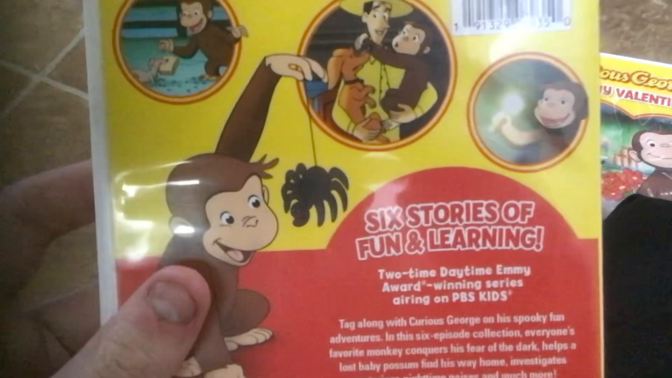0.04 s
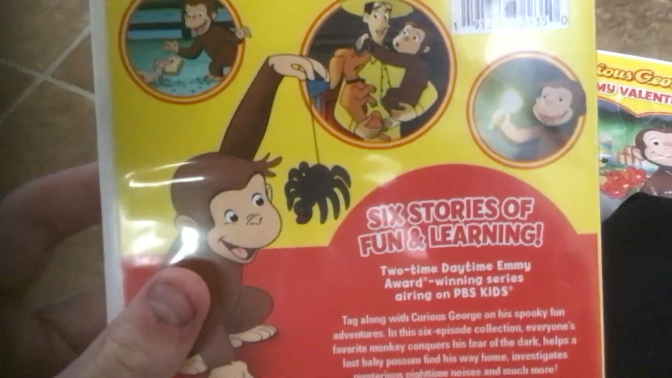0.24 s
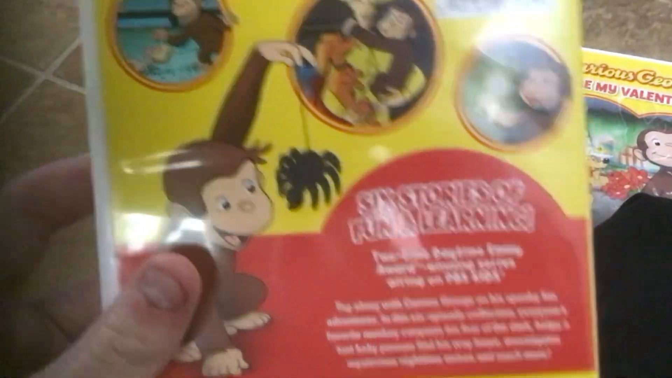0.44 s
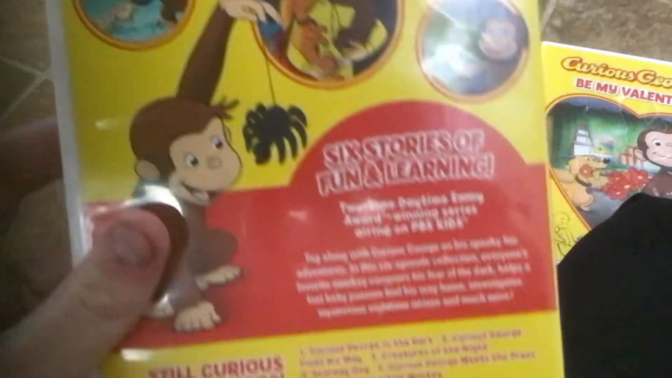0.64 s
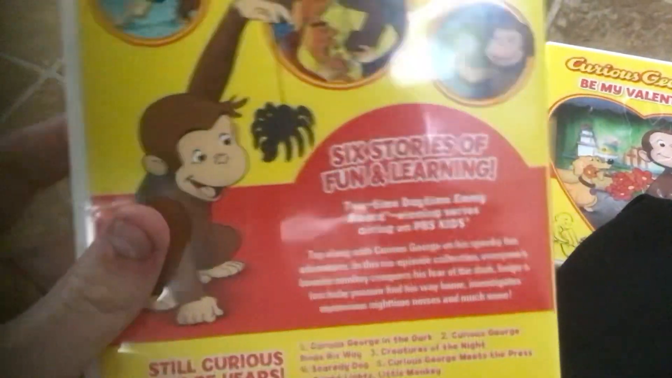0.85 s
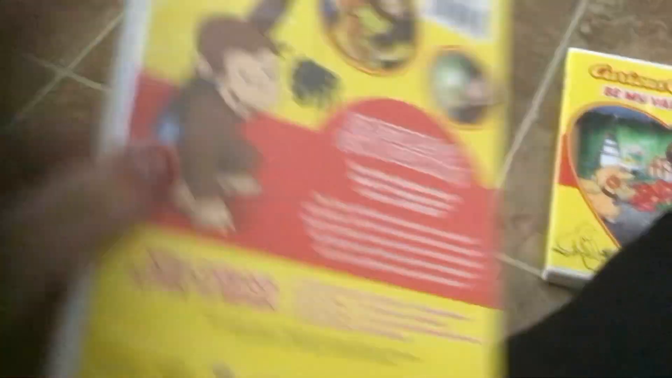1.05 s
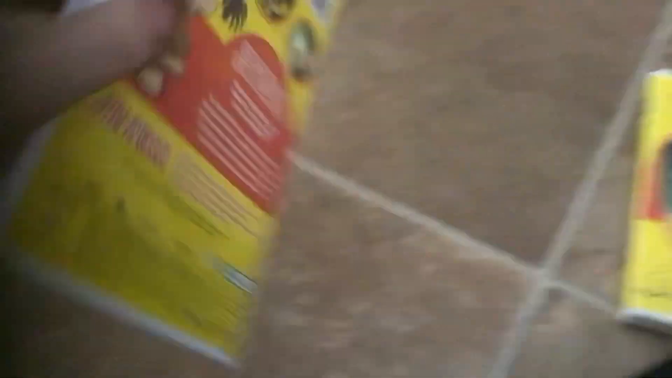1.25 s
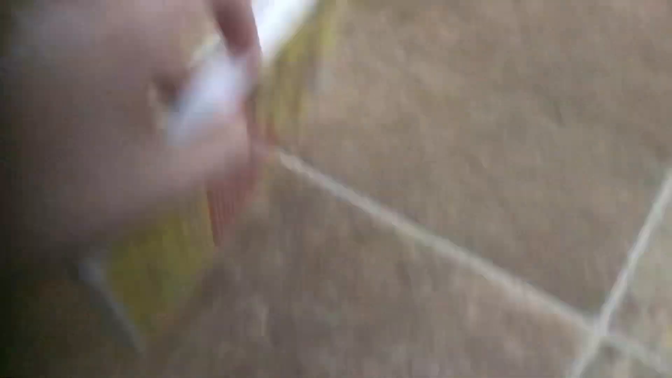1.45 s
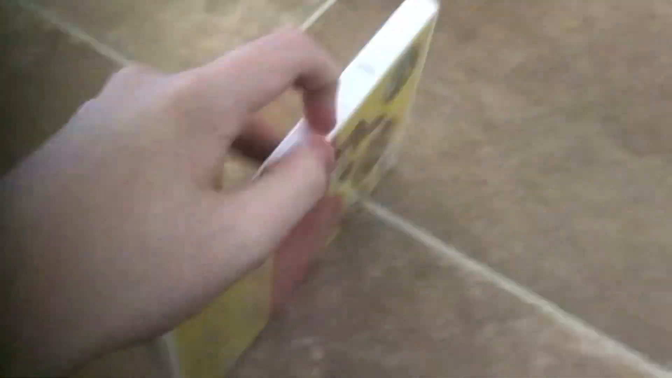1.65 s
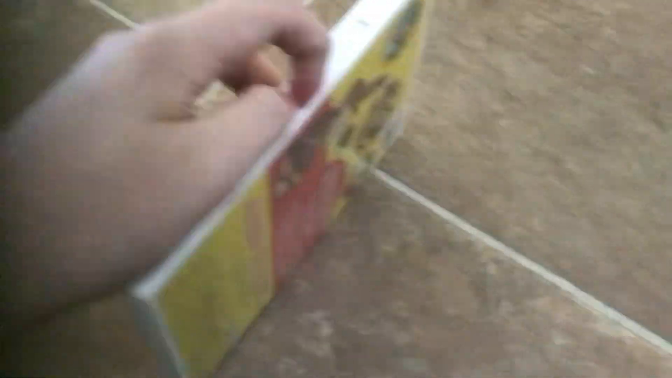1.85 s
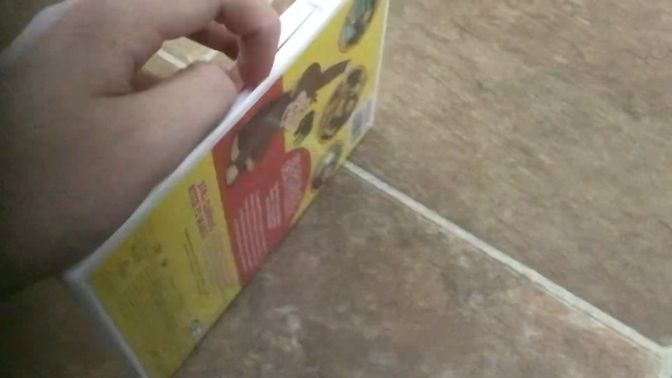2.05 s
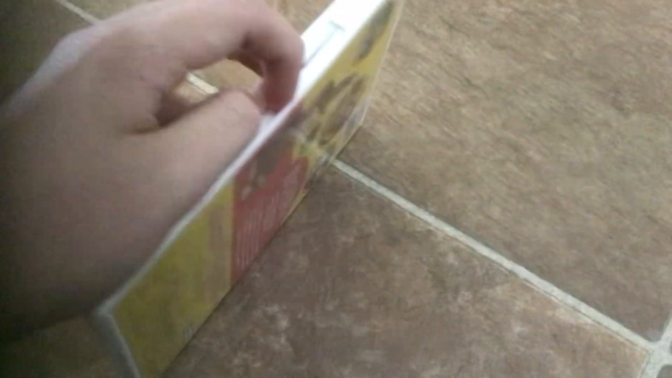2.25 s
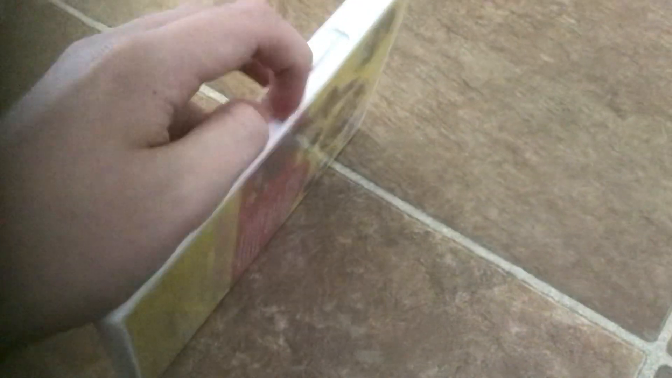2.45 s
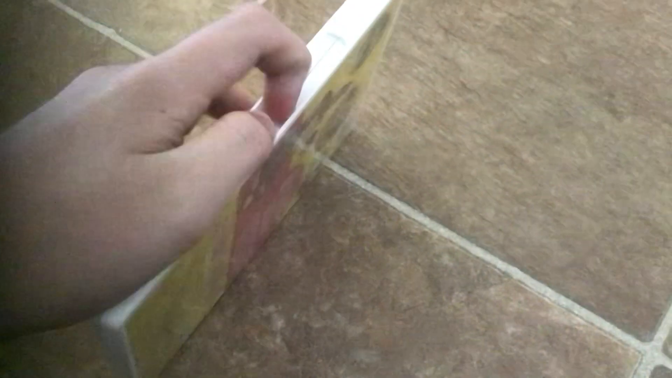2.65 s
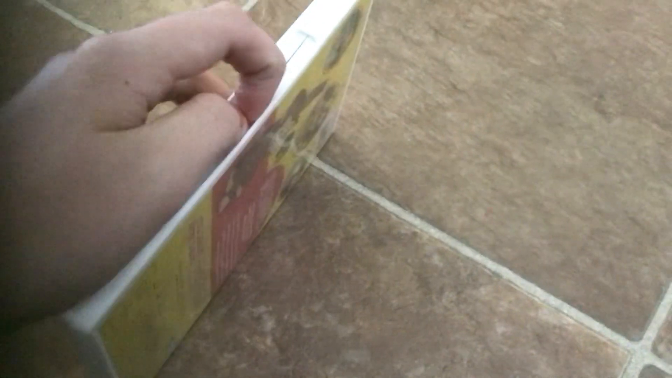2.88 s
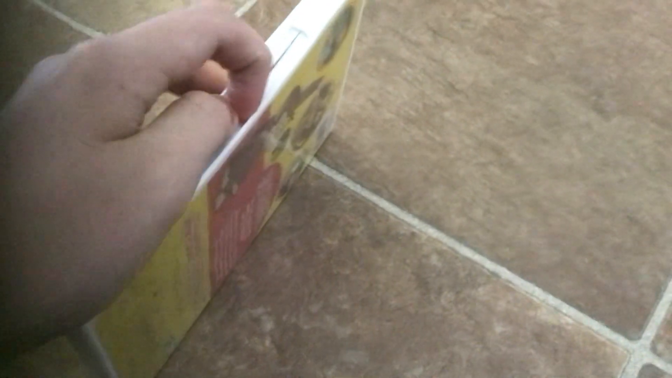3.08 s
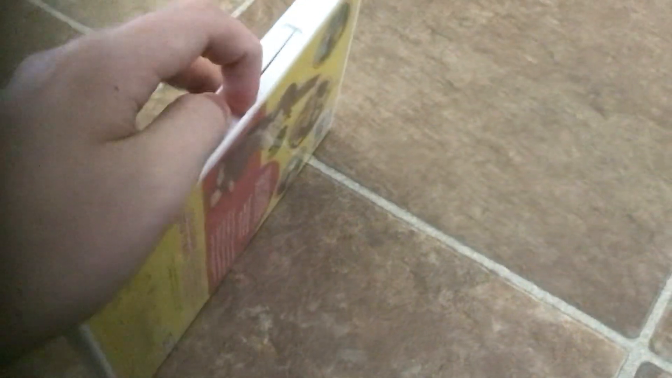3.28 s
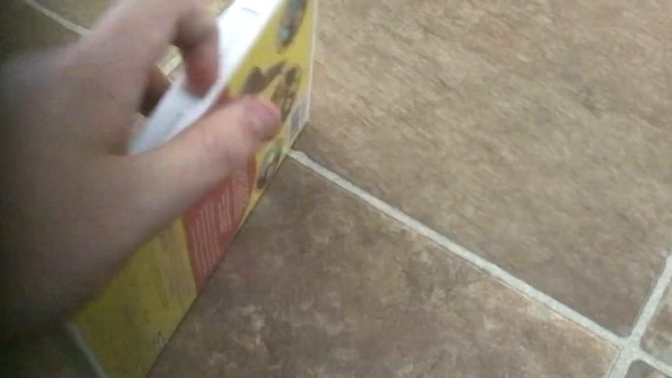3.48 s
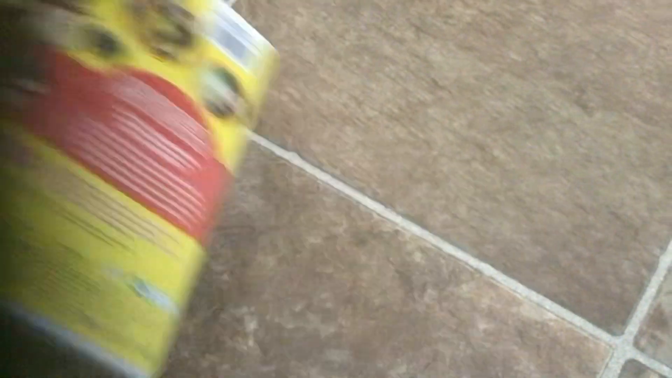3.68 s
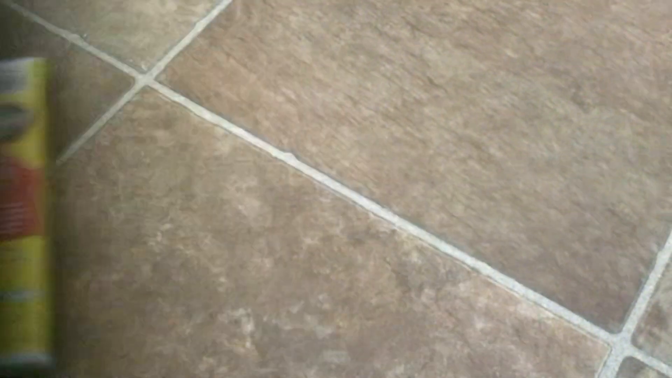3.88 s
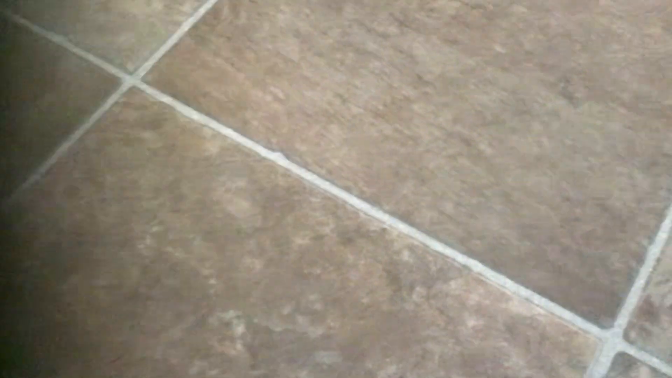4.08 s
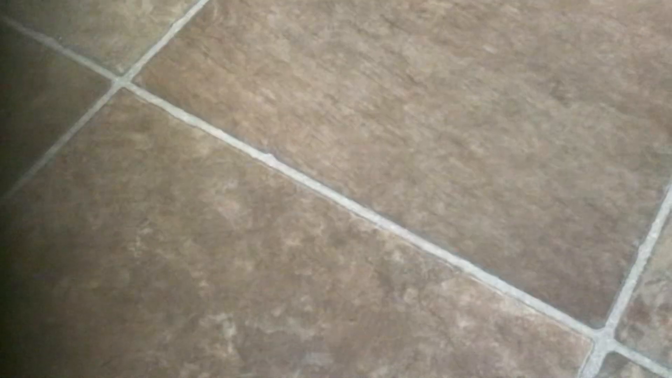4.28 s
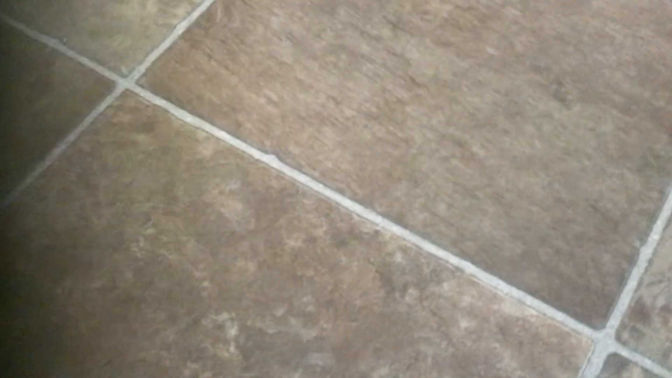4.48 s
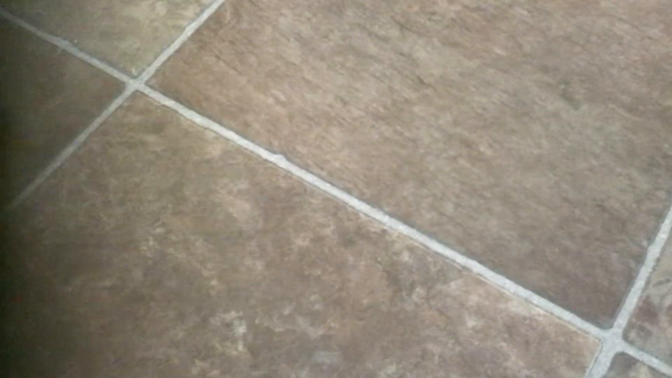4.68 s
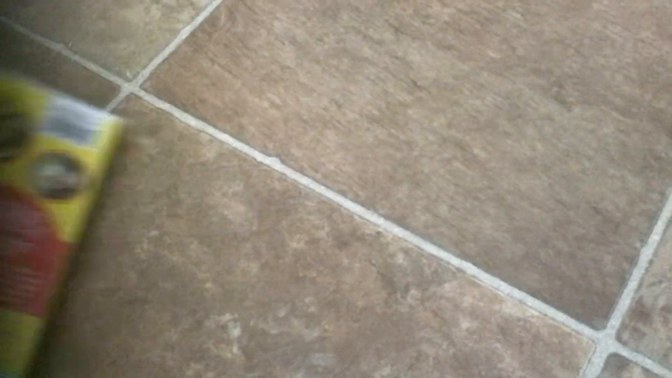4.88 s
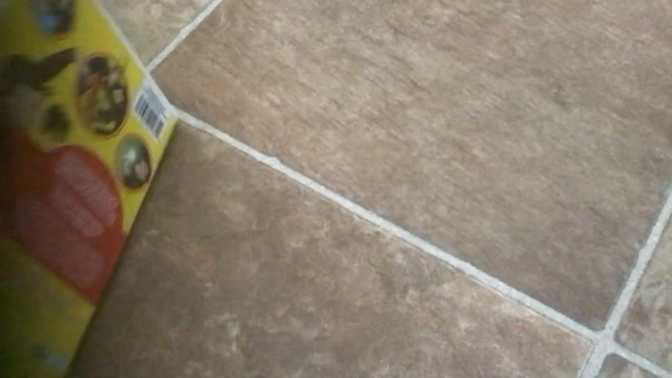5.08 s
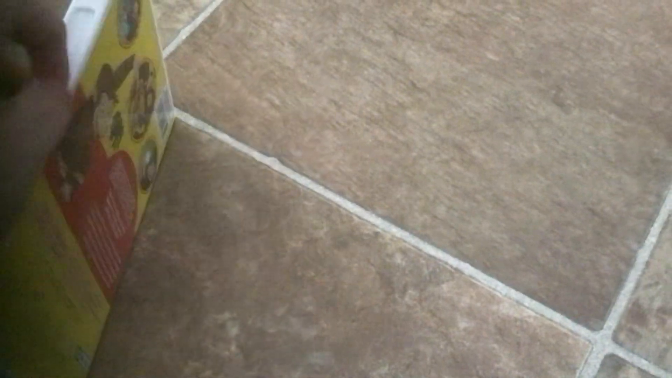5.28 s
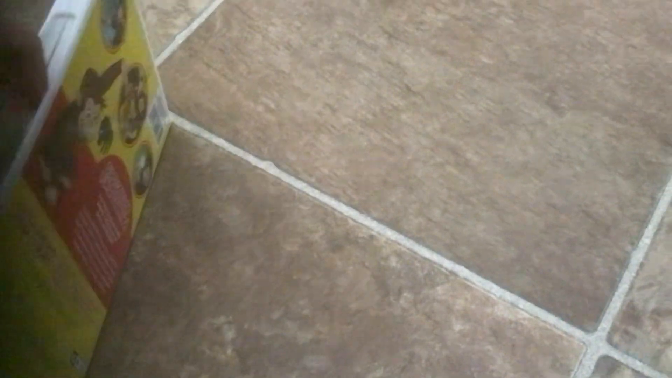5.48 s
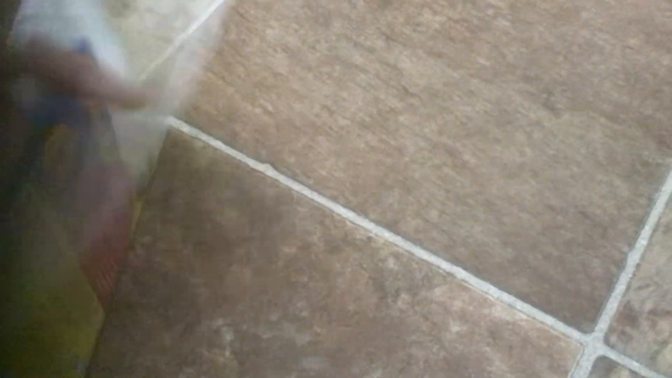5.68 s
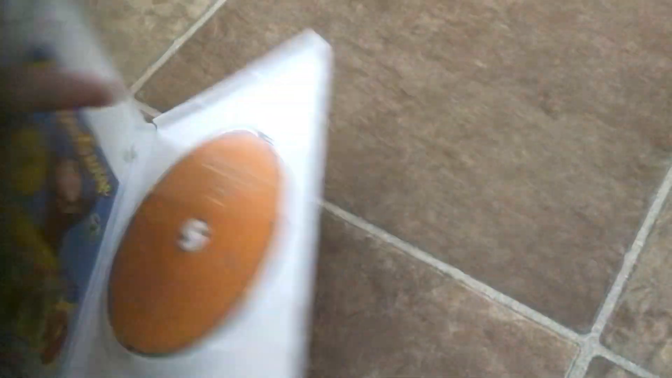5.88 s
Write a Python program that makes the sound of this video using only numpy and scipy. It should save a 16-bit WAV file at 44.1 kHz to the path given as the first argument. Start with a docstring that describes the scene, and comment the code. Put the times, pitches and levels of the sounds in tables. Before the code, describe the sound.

Close, plain indoor capture: a distant engine drone fades away early under soft hiss. A thin plastic case ticks and slides under fingers, knocks hard against the floor, then is gently worked with tiny film crackles. Clicking builds into a longer burst of snaps and knocks, drops back to creaks and soft bumps, and ends with a bright clasp snap ringing briefly in the room.

```python
"""Room tone and a low hum, noise and wavering sines, persist; a distant engine drone sinks and fades early on.
A hand turns a thin plastic disc case close to a microphone: creaks and slides are resonance-filtered noise.
Light ticks, interrupted by three bursts of hard knocks on a tiled floor and snaps of the clasps it pries open,
excite damped modes of shell, lid panels and air pocket; bright flecks of the sleeve film, short noise bursts,
are scattered among the ticks. A bare room answers contacts and handling by convolution with decaying noise."""
import sys
import numpy as np
from scipy import signal
from scipy.fft import rfft, irfft, next_fast_len
from scipy.io import wavfile
from scipy.ndimage import map_coordinates

SR = 44100
rng = np.random.default_rng(int(sys.argv[2]) if len(sys.argv) > 2 else 0)


def to_wav(s):
    """Save 16-bit WAV."""
    ch = np.atleast_2d(s).T  # columns
    pcm = np.round(np.clip(ch, -1, 1) * 32767)  # PCM
    wavfile.write(sys.argv[1], SR, pcm.astype(np.int16))


N = 261513

# bending modes of the shell: [f/Hz, nominal bandwidth/Hz, relative level/dB]
SHELL_MODES = [(1385, 440, -9), (1617, 230, -1), (1795, 160, -1), (1947, 190, 2), (2114, 180, -1.5),
               (2448, 250, -6.5), (2604, 120, -3), (2816, 190, -2.5), (3121, 220, 3), (3365, 130, -5),
               (3690, 190, -7), (4215, 190, -10), (4698, 620, -12), (5270, 650, -17.5), (6200, 2200, -22.5)]
# slow modes of the lid panels: [f/Hz, bandwidth/Hz, relative level/dB]
PANEL_MODES = [(94.5, 32, -3.5), (148.3, 7.4, 0), (185.6, 23.3, -1), (267.3, 45.7, -3), (372.7, 80, -11.5)]
# resonances of the air pocket between the lids: [f/Hz, nominal bandwidth/Hz, relative level/dB]
HOLLOW_MODES = [(586.4, 70, -3.5), (705, 110, -8.5), (980, 330, 2), (1127, 530, 4)]
RIM_HZ = 2500  # shell modes above this belong to the stiff rim


def amp(db):
    """Logarithmic level: decibels become an amplitude ratio."""
    return 10 ** (np.asarray(db) / 20)


def unit(x):
    """Normalisation of a signal to rms 1."""
    return x / np.sqrt(np.mean(x ** 2) + 1e-20)


def peak_one(x):
    """Normalisation of a signal to peak 1."""
    return x / np.abs(x).max()


def along(points, hz):
    """Spectral interpolation of (f/Hz, value) points on a logarithmic frequency axis."""
    f, value = np.transpose(points)
    return np.interp(np.log(hz + 1), np.log(f + 1), value)


def curves(rows):
    """Linear interpolation in time: one value per sample for each column after t/s."""
    knot_s, *columns = np.transpose(rows)
    return [np.interp(np.arange(N) / SR, knot_s, column) for column in columns]


def wobble(rate):
    """Slow random modulation: a spline through Gaussian values, rate knots per second."""
    knots = rng.standard_normal(int(N * rate / SR) + 4)
    return map_coordinates(knots, [np.arange(N) * rate / SR])


def filtered(x, response):
    """Linear filtering: the spectrum of x times a response of frequency."""
    m = next_fast_len(len(x) + 4096)
    return irfft(rfft(x, m) * response(np.fft.rfftfreq(m, 1 / SR)), m)[:len(x)]


def modes(table, extra_db=0):
    """Modal superposition: the causal response of a sum of resonances with alternating sign."""
    rows = np.array(table, float)
    centre, width = rows[:, :1], np.abs(rows[:, 1:2])
    db = rows[:, 2:] + np.reshape(extra_db, (-1, 1))
    sign = (-1.) ** np.arange(len(rows))[:, None]

    def response(f):
        """Band-pass resonators, each of unit gain at its centre before its level."""
        resonance = 1j * f * width / (centre * centre - f * f + 1j * f * width)
        return np.sum(sign * amp(db) * resonance, axis=0)
    return response


def grit(rate, depth_db):
    """Amplitude modulation: white noise whose level in dB wanders at random, rate knots per second."""
    return rng.standard_normal(N) * amp(depth_db * wobble(rate))


def tone(hz, db):
    """Phase integration: a sine whose frequency and rms level waver slightly."""
    phase = 2 * np.pi * np.cumsum(hz + 1.2 * wobble(46)) / SR
    level = np.sqrt(2) * amp(db + 1.4 * wobble(2.7))
    return level * np.sin(phase + rng.uniform(0, 2 * np.pi))


def background():
    """Superposition of shaped room noise, steady hum lines and two gliding, fading drone tones."""
    # room tone and hiss: [f/Hz, relative spectral density/dB per Hz]
    air_spectrum = [(42, -24), (72, 0.5), (136, -3.5), (178, -16.5), (336, -32), (579, -25), (760, -30.5),
                    (998, -35.5), (1280, -37.5), (1530, -34), (3100, -42.5), (3550, -39), (10100, -45.5),
                    (16200, -49)]
    # hum lines: [f/Hz, mean level/dB]
    hum_lines = [(59, -63.5), (120, -74)]
    # upper tone of the engine drone: [t/s, f/Hz, mean level/dB]
    upper_drone = [(0, 108, -53), (.3, 106.9, -56.5), (.56, 103.5, -59), (.78, 99.7, -56.5),
                   (.9, 96.3, -68.5), (1.05, 92.4, -68), (1.3, 85.07, -60.5), (1.45, 84.4, -64),
                   (2.05, 85, -63.5), (2.2, 84.2, -88)]
    # lower tone of the engine drone: [t/s, f/Hz, mean level/dB]
    lower_drone = [(0, 62.24, -51.5), (.1, 65.16, -55.5), (.55, 66.16, -57.5), (.77, 63.24, -52),
                   (.85, 62.3, -71), (.95, 62.76, -94)]
    air = amp(-67) * unit(filtered(grit(16, 0.6), lambda f: amp(along(air_spectrum, f))))
    hum = sum(tone(*line) for line in hum_lines)
    drone = tone(*curves(upper_drone)) + tone(*curves(lower_drone))
    return air + hum + drone


def room(x):
    """Reverberation: convolution with noise in which each frequency decays at its own rate."""
    # reverberation time: [f/Hz, T60/s]
    decay_times = [(150, 0.37), (600, 0.49), (2000, 0.44), (5000, 0.43), (12000, 0.27)]
    # colour of the echo: [f/Hz, relative level/dB]
    echo_colour = [(100, -6.5), (300, 1.5), (900, -2.5), (1600, -2.5), (2000, -1.5), (2400, -4),
                   (3300, -5.5), (5500, 5.5), (14000, -1.5)]
    hz, t, z = signal.stft(rng.standard_normal(SR // 2), SR, nperseg=256)
    decay_db = 60 * t / along(decay_times, hz)[:, None]
    z = z * amp(along(echo_colour, hz)[:, None] - decay_db)
    tail = signal.istft(z, SR, nperseg=256)[1]
    tail = tail * np.clip(np.arange(len(tail)) / (0.0047 * SR), 0, 1)  # first walls arrive after a few ms
    return signal.fftconvolve(x, tail / np.linalg.norm(tail))


def hand():
    """Power addition: each movement rises exponentially up to its start, holds and decays exponentially."""
    # movements of the hand: [start t/s, length/s, creak level/dB,
    # then re creak: rim creak/dB, finger slide/dB, hollow scrape/dB, grip rumble/dB]
    moves = [(0.194, .4, -88.5, -7, -5, -5, 19.5), (0.901, 0.13, -72, -5, -8, -11, 3.5),
             (1.049, 0.24, -74, -7, 0.5, 0.5, -1), (1.288, 0.3, -84.5, -7, 6, 2.5, 12),
             (1.8, 0.15, -70, -6, -14.5, -3.5, 6), (2.001, 0.25, -82.5, -10, -9.5, -2, -2),
             (2.5, 0.059, -83.5, -10, -8.5, -7.5, 4), (2.59, .09, -77.5, -7.5, -11.5, -3, 7),
             (2.69, 0.11, -72, -12, -13, -8, 3.5), (2.87, 0.12, -76, -9.5, -12.5, -6, 3),
             (2.934, 0.025, -81, -4.5, 2, -15.5, 4), (3.14, 0.098, -77, -8, -13, -5.5, 4.5),
             (3.44, 0.06, -72, -6.5, -6, -6, -3), (3.532, .17, -64.5, -8.5, -18, -4, 0),
             (3.719, 0.16, -63, -6, -15, -8, 2), (4.083, 0.15, -62, -7.5, -17, -2, -1.5),
             (4.263, 0.039, -73, -4, -1.5, -8, 7.5), (4.34, 0.079, -74.5, -6, -10.5, -5, 8.5),
             (4.44, 0.088, -71.5, -9, -5.5, -4.5, 4), (4.576, 0.03, -70.5, 4, -8, -7.5, 8.5),
             (4.63, 0.049, -79, -7.5, -7, -10, 11), (4.705, 0.079, -70.5, -3, -8.5, 7.5, 3.5),
             (4.816, 0.065, -76, -8.5, -10, -1.5, 5.5), (4.884, 0.1, -64, -7.5, -10.5, 0.5, 6.5),
             (5.09, .09, -73, -8, -6.5, -3, 0.5), (5.19, 0.15, -74.5, -5.5, -15, -5, 3.5),
             (5.429, 0.078, -70, -7, -24, 0, 9.5), (5.561, 0.24, -74.5, -7, -7, -1.5, -1.5)]
    # the still hand, levels/dB: [creak, rim creak, finger slide, hollow scrape, grip rumble]
    rest_db = [-91, -98.5, -89.5, -91.5, -72]
    rise_db_per_s, fade_db_per_s = 505, 251.5
    t = np.arange(N) / SR
    power = amp(np.reshape(rest_db, (-1, 1))) ** 2
    for s, length, db, *others in moves:
        rise_db = -rise_db_per_s * np.maximum(s - t, 0)
        fade_db = -fade_db_per_s * np.maximum(t - s - length, 0)
        layer_gain = amp(db + np.array([0, *others]))[:, None]
        power = power + layer_gain ** 2 * amp(2 * (rise_db + fade_db))
    return np.sqrt(power)


def handling():
    """Friction noise: grains excite shell, air pocket and panels, skin hisses on the sleeve; the room answers."""
    # fingers on the sleeve: [f/Hz, relative spectral density/dB per Hz]
    slide_spectrum = [(2350, -27), (4000, 2), (4170, -1.5), (4900, -6.5), (5380, -11), (6440, -8.5),
                      (10800, -3), (12500, -7.5), (16000, -28.5)]
    strain = grit(180, 3.2)  # shared by the creaks of body and rim
    creak = unit(filtered(strain, modes([m for m in SHELL_MODES if m[0] <= RIM_HZ])))
    rim = unit(filtered(strain, modes([m for m in SHELL_MODES if m[0] > RIM_HZ])))
    slide = unit(filtered(grit(98, 1.87), lambda f: amp(along(slide_spectrum, f))))
    scrape = unit(filtered(grit(88, 1.5), modes(HOLLOW_MODES, [-2.0, 8.5, -1.0, -7.5])))
    grip = unit(filtered(grit(25, 2), modes(PANEL_MODES)))
    near = np.sum(hand() * [creak, rim, slide, scrape, grip], axis=0)
    return near + amp(-6.5) * room(near)[:N]


def contacts():
    """Impact parameters as (t/s, blow/dB, thud, hollow, crack and rim modes/dB, contact time/s)."""
    # light ticks of the shell under the fingers:
    # [t/s, blow level/dB, crack re blow/dB, rim modes re lower modes/dB]
    tick_rows = [(0.914, -46.5, -3, 3), (0.962, -51, -31, -5.5), (1.095, -37.5, -27, -9),
                 (1.104, -29.5, -13, -2), (1.124, -45.5, -4, -9), (1.132, -40, -25, 2.5),
                 (1.157, -52, -12, 5.5), (1.194, -39, -33, -1), (1.211, -48.5, -26, 1.5),
                 (1.238, -57.5, -10.5, -4.5), (1.332, -51, -16, -1.5), (1.418, -60.5, -11, -5),
                 (1.455, -50.5, -9.5, -10), (1.815, -38, -11.5, -9), (1.835, -45, -21, -4),
                 (1.841, -44, -30, -2), (1.861, -47, -26, -4), (1.927, -58.5, -21, 0),
                 (2.141, -49.5, -30, -6), (2.502, -69, -8, -10.5), (2.6, -73, 3, 12), (2.656, -52, -18, -8),
                 (2.675, -46.5, -17, -11), (2.828, -53.5, -13, -5), (3.438, -62.5, -1.5, -1.5),
                 (3.479, -52.5, -4.5, -7.5), (3.511, -43.5, -18, 5), (3.543, -58, -21, -3),
                 (3.569, -28, -20, -0.5), (3.581, -34.5, -15.5, -13.5), (3.626, -41, -14, -7.5),
                 (3.639, -38.5, -19, 7.5), (3.654, -36, -28.5, -1.5), (3.675, -42, -24, -4),
                 (3.739, -43.5, -25.5, -2.5), (3.78, -55.5, -12.5, -9), (4.08, -32.5, -15.5, -9),
                 (4.47, -50.5, -14.5, -16), (4.495, -58, -12, 2), (4.889, -46.5, -9, -6.5),
                 (4.937, -51, -13, -3), (5.009, -55, -17, -1.5), (5.134, -45, -12, -2.5),
                 (5.177, -55, -21, -2), (5.216, -57, -23, -9.5), (5.355, -50.5, -13, -17.5),
                 (5.426, -44, -0.5, -10), (5.448, -40.5, -11, -2.5), (5.475, -40, -18, -1.5),
                 (5.507, -43.5, -33, 4), (5.574, -55.5, -22, 10), (5.589, -50, -20, 2)]
    # hard knocks on the floor and clasp snaps, with their rattles: [t/s, blow level/dB,
    # thud re blow/dB, hollow knock re blow/dB, crack re blow/dB, rim modes re lower modes/dB, contact time/s]
    knocks = [(1.505, -22, -0.5, -3, -4.5, 0, 0.0017), (1.514, -23, -3, -14.5, -21, -1, 0.0021),
              (1.525, -4, -20.5, -6, -18.5, -7, 0.001), (1.538, -17, -4, -13.5, -14.5, -0.5, 0.0026),
              (1.548, -22.5, -8.5, -11, -13, 4, 0.0012), (3.832, -9, -23.5, -17.5, -18.5, -12, 0.0027),
              (3.853, -18, -20, -8.5, -13, 1.5, 0.0034), (3.865, -23.5, -19.5, -9, -18.5, 3.5, 0.0025),
              (3.873, -23, -23, -17.5, -21.5, 4.5, 0.0012), (3.891, -9.5, -22, -9.5, -16, -10, 0.0015),
              (3.908, -13.5, -30, -4.5, 2, -1, 0.00068), (3.911, -8, -16, -10, -7.5, -8, 0.0015),
              (3.9161, -2.5, -16.5, -7.5, -19, -5, 0.00089), (3.924, -16, -18.5, -9, -13, 14.5, 0.0079),
              (3.939, -18.5, -18, -8.5, -25.5, -7.5, 0.0031), (5.708, -5, -18, -14, -9.5, -12.5, 0.0025),
              (5.72, -11, -23, -21.5, -12, 4.5, 0.0019), (5.7265, -4, -25, -15.5, -12.5, -1, 0.0009)]
    # soft bumps of the hand, felt mostly by the panels: [t/s, thud level/dB]
    bump_rows = [(1.446, -51.5), (4.39, -48), (4.421, -52.5), (4.6, -47.5), (5.439, -44.5)]
    contact_s, tick_hollow_db, bump_thud_db = 0.0023, -12, 12.5
    # thud level of a tick at 0 dB; dB it drops per dB of a lighter tick
    tick_thud_db, thud_follows = -40.5, .45
    ticks = [(s, db, tick_thud_db - (1 - thud_follows) * db, tick_hollow_db, crack, rim, contact_s)
             for s, db, crack, rim in tick_rows]
    bumps = [(s, db - bump_thud_db, bump_thud_db, -5, -14, 0, contact_s) for s, db in bump_rows]
    return knocks + ticks + bumps


def rings(table, t, contact, damping, extra_db=0):
    """Free vibration: modes decay from one blow with random onset, phase, detuning and strength."""
    hz, width, db = np.transpose(table)[:, :, None]
    late, phase = rng.random((2, len(table), 1))
    detune, vary = rng.standard_normal((2, len(table), 1))
    since_onset = np.maximum(t - 1.3 * contact * late ** 2, 0)
    attack = 1 - np.exp(-since_onset / (0.28 * contact))
    decay_s = np.hypot(contact, 1 / (np.pi * width * damping))
    shape = attack * np.exp(-since_onset / decay_s)
    gain = amp(db + extra_db + 1.5 * vary)
    wave = np.sin(2 * np.pi * (hz * (1 + .012 * detune) * t + phase))
    return np.sum(gain * shape * wave, axis=0) / np.linalg.norm(gain)


def clicks():
    """Impact excitation: a brief jolt rings shell and hollow, thumps the panels and cracks in the treble."""
    # sharp edge of a click: [f/Hz, relative spectral density/dB per Hz]
    crack_spectrum = [(2350, -20.5), (4000, 3.5), (5390, -17), (6130, -8), (10900, -10), (11600, -13),
                      (12500, -10), (16200, -30.5)]
    out, t = np.zeros(N + SR), np.arange(SR // 8) / SR
    on_rim = np.array(SHELL_MODES)[:, :1] > RIM_HZ
    panel_octaves = np.log2(np.transpose(PANEL_MODES)[0] / 200)
    push = np.diff(t * np.exp(-t / 0.0005), prepend=0)  # the panels feel one rounded shove and its release
    for s, db, thud_db, hollow_db, crack_db, rim_db, contact in contacts():
        damping = amp(.14 * db)  # light ticks bend the plastic less, lose less and ring on longer
        ring = 1.23 * rings(SHELL_MODES, t, contact, damping, on_rim * rim_db)
        hollow = 1.67 * rings(HOLLOW_MODES, t, contact, 0.88)

        deep_db = -.6 * max(thud_db - 2.5, 0) * panel_octaves  # fleshy bumps favour the lowest modes
        vary_db = 2 * rng.standard_normal(len(PANEL_MODES))
        thud = peak_one(filtered(push, modes(PANEL_MODES, deep_db + vary_db)))

        force = (1 - np.exp(-t / (0.11 * contact))) * np.exp(-t / (1.5 * contact))
        burst = force * rng.standard_normal(len(t))
        crack = peak_one(filtered(burst, lambda f: amp(along(crack_spectrum, f))))

        parts = ring + amp(thud_db) * thud + amp(hollow_db) * hollow + amp(crack_db) * crack
        blow = amp(db) * parts
        echo = amp(0.16 * db - 5) * room(blow)  # hard blows shake the whole case and fill the room more
        start = round(s * SR)
        out[start:][:len(t)] += blow
        out[start:][:len(echo)] += echo
    return out[:N]


def flecks():
    """Transient noise: the sleeve film gives bright bursts under two-sided exponential envelopes."""
    # tiny flecks of the sleeve film: [t/s, peak level/dB]
    fleck_rows = [(2.0857, -60), (2.5, -56), (2.518, -65.5), (2.6191, -61.5), (2.6736, -57.5),
                  (2.9846, -61), (3.1396, -57.5), (3.3785, -63.5), (4.359, -71), (4.8914, -61.5),
                  (5.2034, -54.5), (5.2986, -59)]
    # their colour: [f/Hz, relative spectral density/dB per Hz]
    fleck_spectrum = [(5000, -25), (8000, -4), (12000, 2.5), (15500, -1)]
    out, t = np.zeros(N), np.arange(SR // 50) / SR
    envelope = np.exp(-np.abs(t - .005) / .0008)  # time constant 0.8 ms on either side
    for s, db in fleck_rows:
        noise = envelope * rng.standard_normal(len(t))
        burst = filtered(noise, lambda f: amp(along(fleck_spectrum, f)))
        out[round((s - .004) * SR):][:len(t)] += amp(db) * peak_one(burst)
    return out


def scene():
    """Linear superposition of background, hand, echoing contacts of the case and film flecks."""
    return (background() + handling() + clicks() + flecks())[None]


def record(dry):
    """Transduction: the microphone high-passes the bass, saturates loud peaks and limits the band."""
    x = filtered(dry[0], lambda hz: 1j * hz / (40 + 1j * hz))  # first-order high-pass, 40 Hz
    x = x / (1 + np.abs(x / .9) ** 4) ** (1 / 4)  # peaks approach 0.9
    return filtered(x, lambda hz: hz < 16100)[None]


dry = scene()
out = record(dry)
to_wav(out)
```